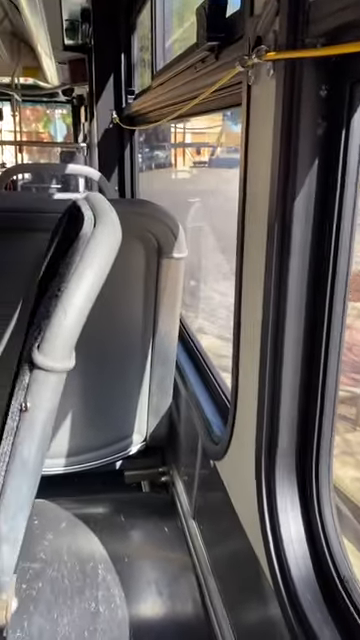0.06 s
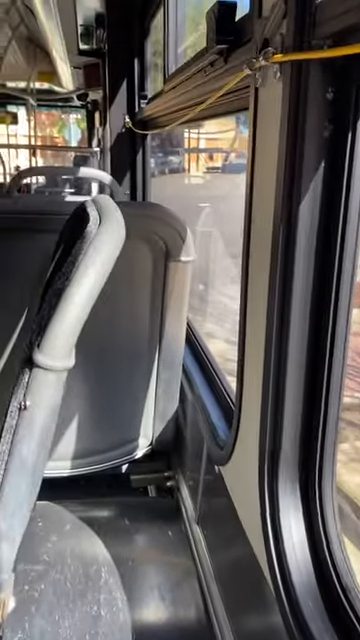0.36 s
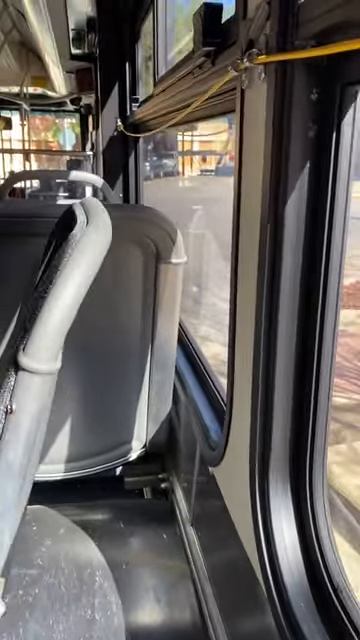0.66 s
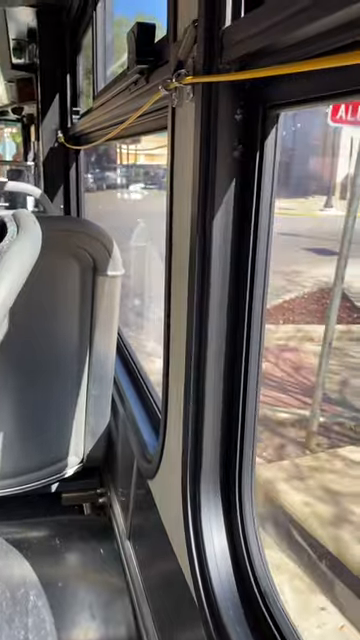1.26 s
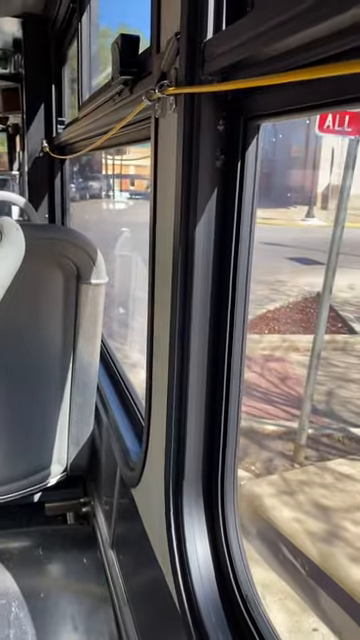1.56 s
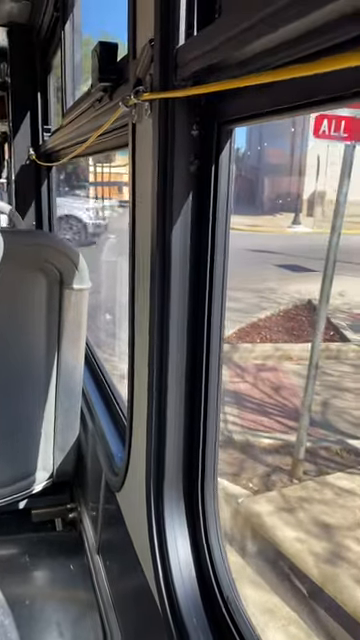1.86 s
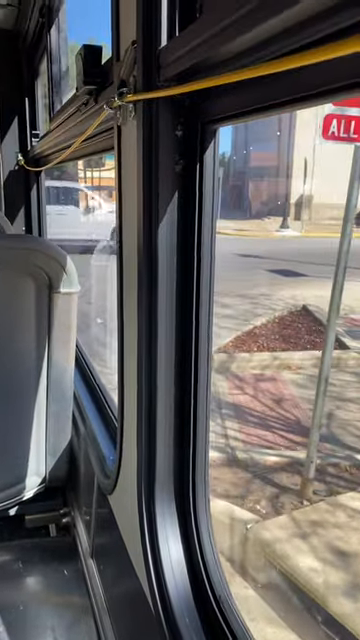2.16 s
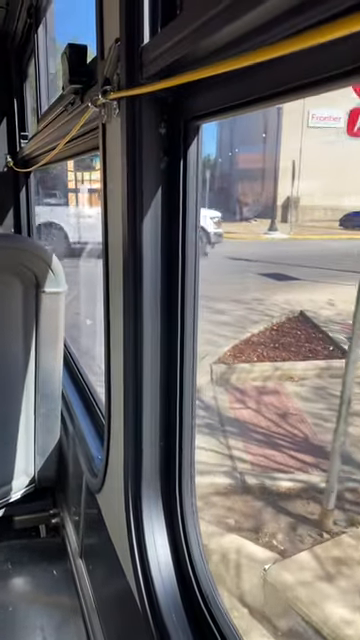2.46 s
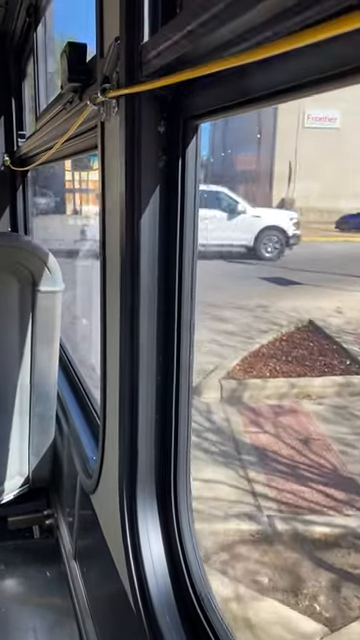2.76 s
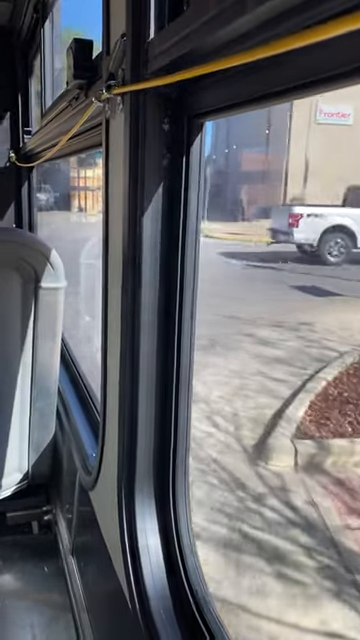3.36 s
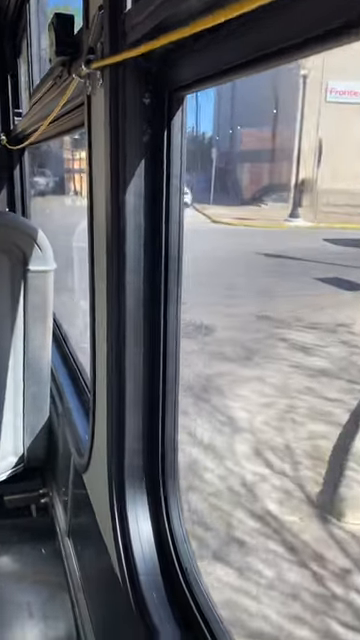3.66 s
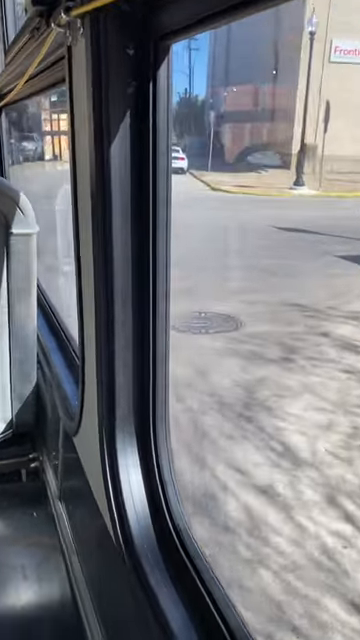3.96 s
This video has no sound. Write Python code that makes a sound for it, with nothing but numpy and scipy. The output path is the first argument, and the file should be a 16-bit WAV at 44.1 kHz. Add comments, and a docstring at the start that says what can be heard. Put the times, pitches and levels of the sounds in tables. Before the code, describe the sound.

A diesel bus engine idles over low rumble and rushing ventilation, then revs up and pulls away with a boom and a climbing gear whine. Heard from inside the cabin, with soft thumps and faint rattles.

```python
"""A diesel idles over road rumble and a rush of ventilation, heard from inside a city bus.
Then the six-cylinder engine revs up and pulls away: its firings boom in the cabin, a belt-driven
shaft sings above them and a gear whine climbs with road speed. The body shakes on its springs,
road bumps thump, panels drone briefly and loose fittings rattle faintly."""
import sys
import numpy as np
from scipy import signal
from scipy.fft import rfft, irfft
from scipy.io import wavfile
from scipy.ndimage import uniform_filter1d

SR = 44100
rng = np.random.default_rng(int(sys.argv[2]) if len(sys.argv) > 2 else 0)


def generate_wav(sig):
    """Save sig (samples, or channels by samples) to the path in sys.argv[1] as 16-bit PCM at SR."""
    pcm = np.round(np.clip(np.atleast_2d(sig).T, -1, 1) * 32767).astype(np.int16)
    wavfile.write(sys.argv[1], SR, pcm)


N = 176400
T = np.arange(N) / SR

# Idle, then the pull away. Each row: time in seconds, crankshaft speed in rpm.
CRANK_RPM = [(0, 702), (1.4, 698), (1.6, 791), (1.8, 923), (2.2, 1171), (2.4, 1281), (2.55, 1365),
             (2.75, 1416), (2.95, 1436), (3.1, 1428), (3.3, 1395), (3.5, 1404), (3.75, 1422), (4, 1453)]
# How hard the engine works. Each row: time in seconds, load from 0 to 1.
ENGINE_LOAD = [(0, 0.01), (1.45, 0.31), (1.7, 0.24), (2.1, 0.63), (2.45, 0.93), (2.75, 0.9), (3.3, 1),
               (4, 0.92)]
# The boom. Each row: time in seconds, firing tone in dB, its octave in dB.
FIRING_LEVELS = [(0, -34, -21.5), (1.4, -29.5, -26.5), (1.7, -23, -16.5), (1.9, -20, -21.5),
                 (2.2, -27, -20), (2.4, -24, -22.5), (2.6, -12.5, -17.5), (2.8, -14, -19.5),
                 (3.05, -22, -14), (3.28, -15, -19), (3.52, -14, -21), (3.75, -15, -15), (4, -13.5, -15)]
# The engine's growl. Each row: multiple of the engine cycle, idle level in dB, loaded level in dB.
ENGINE_ORDERS = [(4, -58, -35), (7, -41, -29), (8, -42, -24), (9, -40, -24), (10, -42, -31), (11, -34, -23),
                 (15, -29, -44), (16, -34, -42), (18, -29, -44), (20, -33, -37), (24, -41, -41),
                 (28, -34, -44), (32, -42, -36), (38, -44, -40)]
# Cabin resonances that lift a passing tone. Each row: centre in Hz, width in Hz, boost in dB.
CABIN_BOOMS = [(84.3, 9, 4.5), (117.8, 11.6, 2.5), (210, 14, 3), (658, 8.5, 10.5), (756, 17, 2.5),
               (843, 9, 7), (1008, 7.2, 4)]
# Colour of the engine roar. Each row: frequency in Hz, relative level in dB.
ROAR_COLOUR = [(100, -41), (250, -2.5), (350, -2.5), (480, -0.5), (620, -4), (780, -6), (880, -9),
               (1020, -9), (1250, -19), (1700, -26), (3000, -32.5), (6000, -84.5)]
# Cabin peaks and nulls in the roar. Each row: centre in Hz, width in Hz, boost or cut in dB.
CABIN_MODES = [(269, 13, -9), (340, 7.7, -3.5), (384, 11, 3), (452, 14, 3), (502, 11, 2), (574, 8.6, -5),
               (604, 22, 4), (670, 12, 1.5), (736, 13, -1.5), (767, 13, 3), (812, 10, -4), (873, 7.4, 0),
               (930, 15, -5.5), (1090, 11, -4)]
# Faders for two noise beds. Each row: time in seconds, road rumble in dB, engine roar in dB.
BED_LEVELS = [(0, -19.5, -26), (.5, -20.5, -26), (1.3, -21, -26.5), (1.75, -21.5, -24.5), (2.3, -21.5, -23),
              (2.7, -22, -24), (3.3, -22, -24), (4, -26, -23)]
# The shaft's low hum. Each row: multiple of its turn, idle level in dB, loaded level in dB.
SHAFT_ORDERS = [(4, -25.5, -30), (5, -32, -33), (6, -33, -33), (7, -36, -34), (8, -28, -35), (9, -42, -38),
                (11, -44, -45), (12, -40, -38)]
# The shaft's high chord. Each row: multiple of its turn, level in dB before the fader.
CHORD_PARTIALS = [(19, -45), (20, -42.5), (21, -39), (22, -35), (24, -33), (25, -43), (26, -44), (28, -39),
                  (30, -41), (31, -43), (32, -47), (33, -49), (43, -56), (44, -57)]
# Fader for that chord. Each row: time in seconds, gain in dB.
CHORD_FADER = [(1.5, -18), (2.3, -10.5), (2.6, -2.5), (3.3, 1), (4, 0.5)]
# Colour of the road rumble. Each row: frequency in Hz, relative level in dB.
RUMBLE_COLOUR = [(30, -34), (52, -17), (70, -7), (100, -5), (130, 1.5), (170, -3.5), (220, -4.5),
                 (300, -10), (450, -24.5), (1000, -79)]
# The blower's hum. Each row: multiple of its turn, level in dB.
BLOWER_PARTIALS = [(2, -34), (6, -47.5), (7, -43.5), (8, -40), (9, -46.5)]
# Colour of the hiss: a broad rush of air that fades through the treble. Separately, the level dips deeply near
# 7 kHz, with faint fizz above. Each row: frequency in Hz, relative level in dB.
HISS_COLOUR = [(200, -5), (900, -1.5), (1400, -1), (1850, -1.5), (2450, 0.2), (2900, -4), (3700, -5.5),
               (4400, -8.5), (5400, -11), (6200, -13), (7200, -47), (8700, -21.5), (11500, -21),
               (13000, -43), (16000, -43)]
# Colour of the deep body shake. Each row: frequency in Hz, relative level in dB.
SHAKE_SPECTRUM = [(8, -4), (22, 0), (33, 5), (46, 6.5), (58, 3), (90, -52)]
# Fader for the shake. Each row: time in seconds, level in dB.
SHAKE_LEVELS = [(0, -30.5), (.6, -28.5), (.9, -30), (1.4, -28.5), (1.85, -30), (2.2, -28.5), (2.4, -37.5),
                (3.05, -28.5), (3.5, -34.5), (4, -34)]
# Body shudders: short low thumps from road bumps, and brief panel drones.
# Each row: start in seconds, length in seconds, pitch in Hz, peak level in dB.
BODY_SHUDDERS = [(0.074, 0.25, 125.2, -17.5), (0.157, 0.2, 204.3, -25), (.35, 0.23, 120, -24),
                 (0.79, 0.087, 72, -15), (0.93, 0.046, 90.4, -20), (0.986, 0.035, 94.9, -13.5),
                 (1.478, 0.13, 75.4, -18), (1.64, 0.099, 80.2, -12.5), (1.6, 0.53, 767, -33.5),
                 (1.707, 0.27, 87.85, -19.5), (1.77, 0.16, 125.6, -19), (1.948, 0.25, 204.7, -21),
                 (2.07, 0.23, 157.3, -23.5), (2.2, 0.18, 221.6, -20), (2.42, 0.22, 245, -25.5)]
# Bursts of chatter. Each row: start in seconds, nominal length in seconds, main ring in Hz, level in dB.
RATTLE_BURSTS = [(.095, 0.054, 3070, -45), (.11, .12, 5100, -45), (.6, .16, 4700, -52),
                 (1.09, 0.097, 3220, -42), (1.115, .16, 5360, -48), (2.09, .1, 5270, -55),
                 (2.61, .06, 5300, -53), (3.04, 0.16, 3280, -50)]
# A fitting's ring. Each row: ratio to the main ring, relative level in dB, seconds to fall by 60 dB.
FITTING_MODES = [(.62, -3, .012), (.87, -6, .012), (1, -4, 0.037), (1.13, -1, .012), (1.22, -6, .01)]
# The climbing whine. Each row: time in seconds, gear mesh pitch in Hz, level in dB.
GEAR_CLIMB = [(2.3, 224, -64), (2.9, 299.4, -50), (3.2, 339.4, -30), (3.47, 394, -26), (3.8, 446, -30.5),
              (4, 456, -30.5)]
# Stereo width. Each row: frequency in Hz, left-right likeness (1 is mono).
STEREO_LIKENESS = [(60, .9996), (140, .998), (210, .988), (310, .95), (480, .76), (720, .7), (1200, .42),
                   (1500, .5), (1900, .86), (2300, .5), (3300, .45), (4100, .6), (4600, .38), (5300, .76),
                   (6500, .75), (16000, .5)]
# Stereo tilt. Each row: frequency in Hz, left minus right in dB.
STEREO_BALANCE = [(70, -.1), (140, -.5), (210, -1), (310, -1.8), (480, -1.3), (720, .2), (1100, .9),
                  (2500, 0)]
# Stereo phase. Each row: frequency in Hz, lead of the left side in radians.
LEFT_LEAD = [(430, 0), (690, .45), (1030, .3), (1400, 0), (2070, .2), (2700, 1.4), (3900, .5), (4400, 1),
             (4800, .2), (5300, .2), (5900, 1.3), (6500, 2.3), (9000, 1.2), (16000, 1.8)]

BELT_RATIO, BLOWER_HZ, BAND_LIMIT_HZ = 1.354, 94.7, 15760
RATTLE_TAPS_PER_S, RATTLE_SPREAD_DB, RATTLE_PEAK_SHARE = 330, 4, 0.26


def amp(db):
    return 10 ** (np.asarray(db) / 20)


def unit(x):
    return x / np.sqrt(np.mean(abs(x) ** 2) + 1e-20)


def curve(table, column=1):
    """One column of a time table, sample by sample."""
    rows = np.array(table, float)
    return np.interp(T, rows[:, 0], rows[:, column])


def at_hz(table, hz):
    """A frequency table's value, interpolated along a log axis."""
    f, value = np.transpose(table)
    return np.interp(np.log(hz + 1), np.log(f + 1), value)


def drift(rate_hz):
    """Slow random wander of unit size."""
    f = np.fft.rfftfreq(2048, 1 / 400)
    slow = irfft(rfft(rng.standard_normal(2048)) / (1 + (f / rate_hz) ** 4))
    return np.interp(T, np.arange(2048) / 400, unit(slow))


def tone(hz, db, rough, rough_hz=14):
    """A slightly rough partial, near mono in the bass and wider higher up."""
    turn = np.exp(2j * np.pi * (np.cumsum(hz) / SR + rng.random()))
    flutter = (drift(rough_hz) + 1j * drift(rough_hz)) / np.sqrt(2)
    mid = (1 + rough * flutter) / np.sqrt(1 + rough ** 2)
    likeness = np.clip(at_hz(STEREO_LIKENESS, hz), -.9, 1)
    side = np.sqrt((1 - likeness) / (1 + likeness) / 2) * (drift(1) + 1j * drift(1))
    return np.sqrt(2) * amp(db) * (turn * np.array([mid + side, mid - side])).real


def noise(colour, patchy_db, size=1024):
    """Unit-level stereo noise of a given colour, with drifting louder and softer patches."""
    frames, hz = N // (size // 4) + 5, np.fft.rfftfreq(size, 1 / SR)
    a, b, c, d, patches = rng.standard_normal((5, frames, len(hz))).transpose(0, 2, 1)
    patches = unit(uniform_filter1d(uniform_filter1d(patches, size=8, axis=0), size=12, axis=1))
    likeness = at_hz(STEREO_LIKENESS, hz)[:, None]
    mid, side = np.sqrt(1 + likeness) * (a + 1j * b), np.sqrt(1 - likeness) * (c + 1j * d)
    spectra = np.array([mid + side, mid - side]) * amp(at_hz(colour, hz)[:, None] + patchy_db * patches)
    return unit(signal.istft(spectra, nperseg=size, noverlap=size - size // 4)[1][:, :N])


def cabin_lift(hz, modes):
    """The dB a sound gains or loses near the cabin's peaks and nulls."""
    return sum(db * np.exp(-((hz - centre) / width) ** 2) for centre, width, db in modes)


def order_stack(base_hz, orders, waver_db):
    """Multiples of one rotation: load shifts their mix and makes them waver; cabin booms lift them."""
    load, out = curve(ENGINE_LOAD), np.zeros((2, N))
    for multiple, idle_db, load_db in orders:
        hz = multiple * base_hz
        db = idle_db + (load_db - idle_db) * load + cabin_lift(hz, CABIN_BOOMS)
        out += tone(hz, db + waver_db * load * drift(3), rough=0.26)
    return out


def engine(cycle_hz):
    """Six firings a cycle boom and pulse the roar; unequal cylinders fill in the other orders."""
    firing_hz = 6 * cycle_hz
    boom = sum(tone(k * firing_hz, curve(FIRING_LEVELS, k) + .7 * drift(3.4), rough=.16, rough_hz=22)
               for k in (1, 2))
    throb = 1 + 0.07 * np.cos(2 * np.pi * np.cumsum(firing_hz) / SR)
    cabin_eq = amp(cabin_lift(np.fft.rfftfreq(N, 1 / SR), CABIN_MODES))
    roar = noise(ROAR_COLOUR, patchy_db=1.0, size=2048)
    roar = unit(irfft(rfft(roar) * cabin_eq, N)) * amp(curve(BED_LEVELS, column=2))
    return boom + roar * throb + order_stack(cycle_hz, ENGINE_ORDERS, waver_db=0.5)


def belt_shaft(turn_hz):
    """A belt-driven shaft hums low at all speeds; its clean high chord swells as the engine pulls."""
    fader_db, chord = curve(CHORD_FADER), np.zeros((2, N))
    for multiple, db in CHORD_PARTIALS:
        hz = multiple * turn_hz
        waver_db = 1.2 * drift(rate_hz=1.2)
        chord += tone(hz, db + fader_db + cabin_lift(hz, CABIN_BOOMS) + waver_db, rough=.07)
    return chord + order_stack(turn_hz, SHAFT_ORDERS, waver_db=1.5)


def road_rumble():
    """Tyres and body lay a low bed of noise under everything."""
    return noise(RUMBLE_COLOUR, patchy_db=1.5, size=4096) * amp(curve(BED_LEVELS, column=1))


def ventilation():
    """The blower hums faintly in a steady hiss, mostly rushing air, rippled by cabin reflections."""
    hum = sum(tone(np.full(N, k * BLOWER_HZ), db, rough=0.6, rough_hz=8.8) for k, db in BLOWER_PARTIALS)
    ripple_db = 1.1 * unit(uniform_filter1d(rng.standard_normal(N // 2 + 1), size=140))
    hiss = irfft(rfft(noise(HISS_COLOUR, patchy_db=1.13)) * amp(ripple_db), N)
    return hum + amp(-38) * unit(hiss)


def body_shake():
    """The body shakes on its springs, down in the sub-bass."""
    return noise(SHAKE_SPECTRUM, patchy_db=0.5, size=8192) * amp(curve(SHAKE_LEVELS))


def body_shudders():
    """Road bumps give short low thumps; panels drone for a moment as the bus works."""
    out = np.zeros((2, N))
    for start, length, hz, db in BODY_SHUDDERS:
        swell = np.sin(np.pi * np.clip((T - start) / length, 0, 1))
        out += tone(np.full(N, hz), db, rough=0.24) * swell
    return out


def rattles():
    """Loose fittings chatter: quick flurries of uneven taps, each ringing briefly."""
    out, t = np.zeros((2, N)), np.arange(2048) / SR
    for start, length, hz, db in RATTLE_BURSTS:
        age = np.maximum(T - start, 0) / (length * RATTLE_PEAK_SHARE)  # the flurry peaks at age 1
        taps = (rng.random(N) < RATTLE_TAPS_PER_S / SR) * amp(RATTLE_SPREAD_DB * rng.standard_normal(N))
        ring = sum(amp(level - 60 * t / t60) * np.sin(2 * np.pi * (hz * ratio * t + rng.random((2, 1))))
                   for ratio, level, t60 in FITTING_MODES)
        chatter = unit(signal.oaconvolve(taps[None], ring)[:, :N])
        out += amp(db) * chatter * age * np.exp(1 - age)
    return out


def gear_whine():
    """Meshing teeth sing one note that fades in and climbs with road speed."""
    return tone(curve(GEAR_CLIMB, column=1), curve(GEAR_CLIMB, column=2), rough=0.27)


def scene():
    """The cabin mix; one engine cycle takes two turns of the crankshaft."""
    crank_hz = curve(CRANK_RPM) / 60
    drive = engine(crank_hz / 2) + belt_shaft(crank_hz * BELT_RATIO)
    bed = road_rumble() + ventilation() + body_shake()
    return drive + bed + body_shudders() + rattles() + gear_whine()


def record(dry):
    """The microphones tilt level and phase between left and right; a low-pass trims the very top."""
    hz = np.fft.rfftfreq(N, 1 / SR)
    left = amp(at_hz(STEREO_BALANCE, hz) / 2) * np.exp(.5j * at_hz(LEFT_LEAD, hz))
    heard = irfft(rfft(dry) * np.array([left, 1 / left]), N)
    lowpass = signal.firwin(511, BAND_LIMIT_HZ, window=("kaiser", 9), fs=SR)
    return signal.oaconvolve(heard, lowpass[None], "same")


dry = scene()
out = record(dry)
generate_wav(out)
```